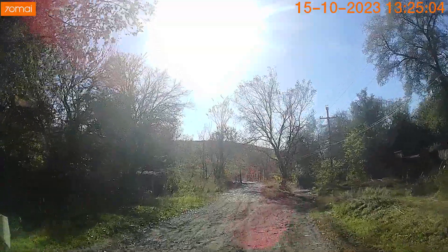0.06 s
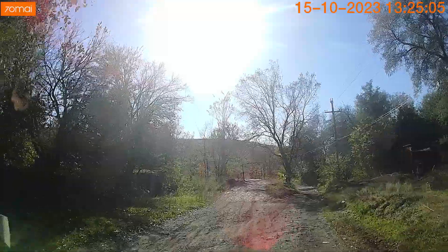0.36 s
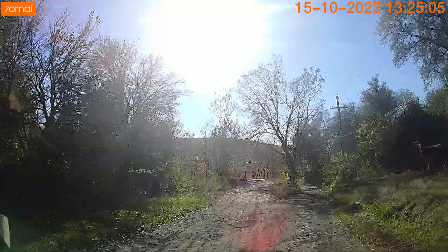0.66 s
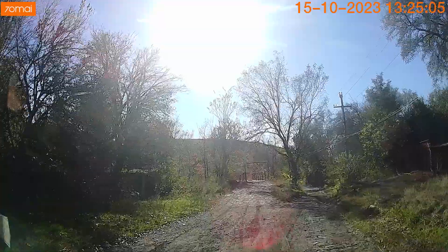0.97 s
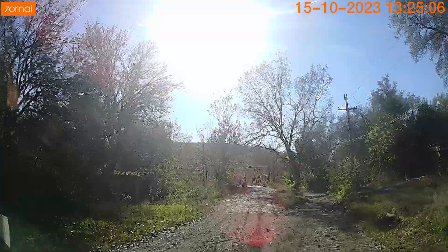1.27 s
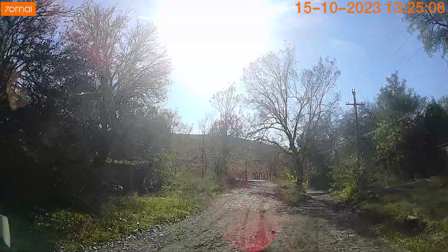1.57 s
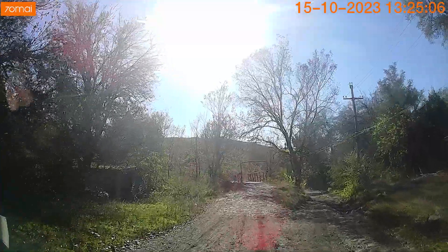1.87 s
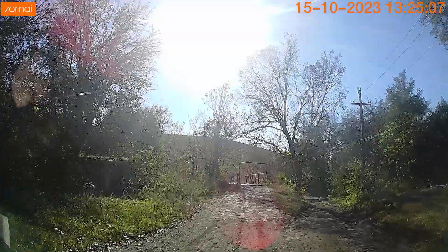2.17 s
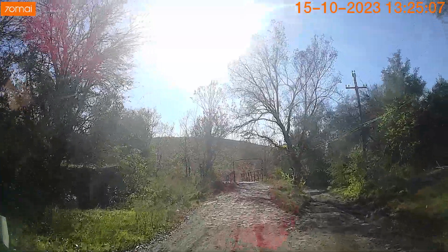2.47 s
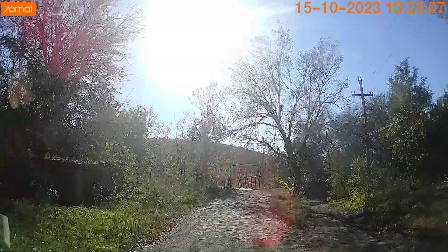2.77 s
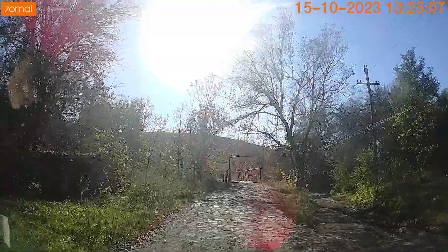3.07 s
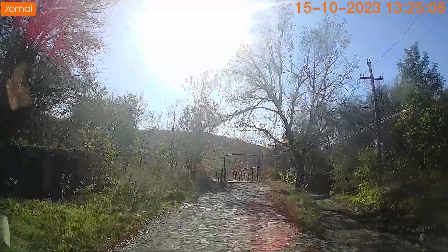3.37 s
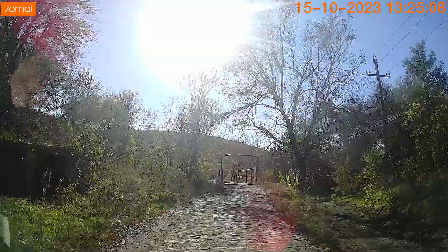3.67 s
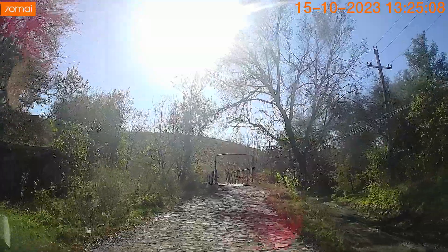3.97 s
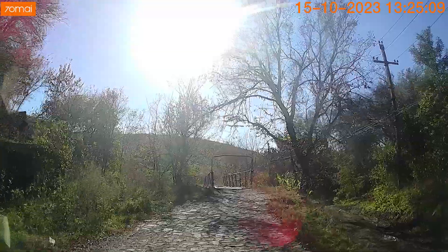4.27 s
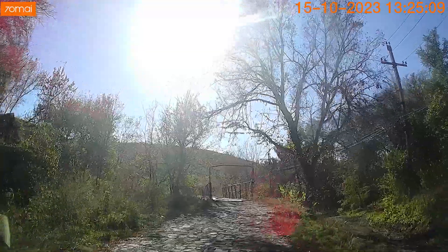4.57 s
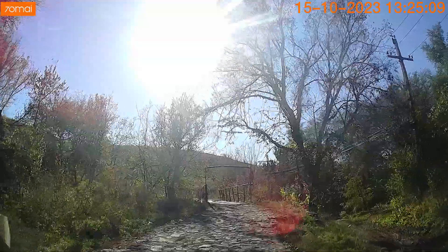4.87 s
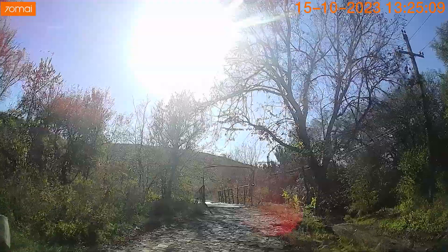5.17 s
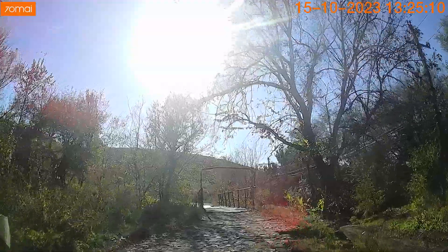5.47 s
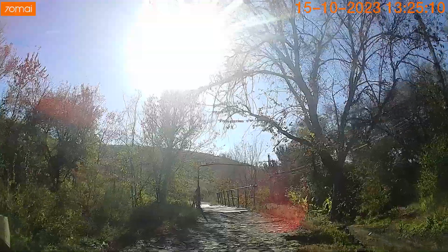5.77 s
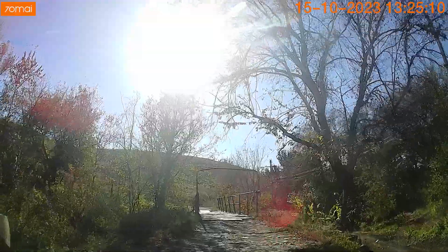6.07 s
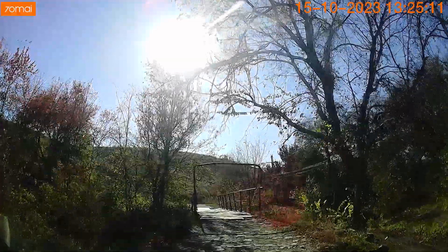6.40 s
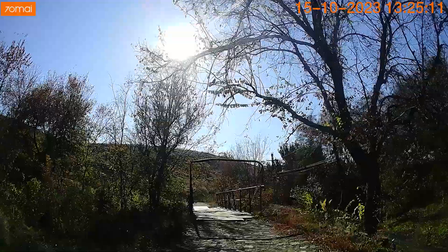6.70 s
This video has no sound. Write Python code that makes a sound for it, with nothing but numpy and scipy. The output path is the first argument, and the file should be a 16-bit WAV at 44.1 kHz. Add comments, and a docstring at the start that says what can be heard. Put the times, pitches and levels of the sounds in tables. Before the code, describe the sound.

Inside a car rolling slowly on a rough road: deep rumble, crunching grit, stones thumping the tyres and loose trim rattling and knocking.

```python
"""A deep, swaying rumble and tyres crunching over grit, inside a car rolling slowly along a dirt road.
Ruts heave the body and make the cabin boom; stones thump the tyres and ring the floor.
Jolts set body sheets humming and loose trim rattling and buzzing; a plastic panel knocks,
a small hard part ticks close by and a tight joint creaks.
After about 4 s the road turns into rough cobbles, and a floor panel starts to drone."""
import sys
import numpy as np
from scipy import signal
from scipy.fft import rfft, irfft, next_fast_len
from scipy.io import wavfile
from scipy.ndimage import uniform_filter1d

SR = 44100
rng = np.random.default_rng(int(sys.argv[2]) if len(sys.argv) > 2 else 0)


def master_out(mix):
    """Clip the mix to full scale and print it as 16-bit PCM to the path in sys.argv[1]."""
    frames = np.transpose(np.atleast_2d(mix))
    ceiling = np.clip(frames, -1, 1)
    pcm = np.round(ceiling * 32767).astype(np.int16)
    wavfile.write(sys.argv[1], SR, pcm)


N = 297234

# Road roughness. Each row: time in seconds, level in dB.
ROAD_ROUGHNESS = [(0.0, -34.5), (0.39, -36), (0.73, -33), (1.31, -37), (1.9, -34.5), (2.19, -31.5),
                  (2.46, -35), (3.4, -35.5), (4.15, -37.5), (4.28, -34.5), (4.49, -30), (4.72, -30.5),
                  (4.86, -32), (5.05, -31), (5.22, -28), (5.69, -33.5), (5.89, -28.5), (6.74, -35)]
# Tyre blows on stones. Each row: start in seconds, level in dB, favoured frequency in Hz.
STONE_HITS = [(0.473, -18.5, 330), (0.535, -19, 300), (0.604, -14.5, 600), (0.667, -10, 176),
              (0.678, -15.5, 250), (0.696, -9.5, 125), (0.721, -20, 191), (1.021, -19.5, 296),
              (1.332, -17, 540), (1.615, -14, 700), (1.839, -23, 330), (2.75, -18.5, 230),
              (2.812, -19, 325), (3.117, -17, 428), (3.155, -18.5, 380), (3.425, -17.5, 480),
              (4.253, -24, 520), (4.387, -11.5, 520), (4.598, -11, 340), (4.663, -12.5, 347),
              (4.721, -16, 206), (4.815, -13.5, 514), (4.897, -11, 520), (4.966, -21, 370),
              (5.027, -11, 337), (5.246, -10, 392), (5.265, -15, 650), (5.279, -12.5, 302),
              (5.312, -10, 620), (5.362, -13.5, 630), (5.668, -11, 253), (5.832, -13, 333),
              (5.997, -21, 196), (6.326, -11, 292), (6.338, -12, 485), (6.376, -18, 400), (6.455, -14, 500),
              (6.525, -16, 360), (6.68, -21.5, 334)]
# Floor and wheel arch modes. Each row: frequency in Hz, level in dB, T60 in seconds.
FLOOR_RESONANCES = [(135, -15, 0.077), (176.6, -2.5, 0.065), (198.8, -9.5, 0.13), (302, -4, 0.047),
                    (365, -5.5, 0.03), (472, -12.5, 0.054), (680, -8.5, 0.0074), (913, -13, 0.052)]


def from_db(db):
    return 10 ** (np.asarray(db) / 20)


def unit_rms(x):
    return x / np.sqrt(np.mean(x ** 2) + 1e-20)


def drift(corner_hz):
    """Low-passed random wander, RMS about 1."""
    hop, settle = 40, 2000
    pole = np.exp(-2 * np.pi * corner_hz * hop / SR)
    noise = rng.standard_normal(N // hop + settle + 2)
    slow = signal.lfilter([1], [1, -2 * pole, pole * pole], noise)[settle:]
    return np.interp(np.arange(N) / hop, np.arange(len(slow)), unit_rms(slow))


def colour(x, spectrum):
    """Minimum-phase filter from (Hz, dB) points; white noise keeps its power."""
    size = 16384
    hz, db = np.transpose(spectrum)
    log_hz = np.log(np.maximum(np.arange(size // 2 + 1) * SR / size, 1))
    outside = np.abs(log_hz - np.clip(log_hz, np.log(hz[0]), np.log(hz[-1])))
    rolloff_db = np.minimum(50 * outside, 70)
    gain = unit_rms(from_db(np.interp(log_hz, np.log(hz), db) - rolloff_db))
    cepstrum = irfft(np.log(gain))
    cepstrum[1:size // 2] *= 2
    cepstrum[size // 2 + 1:] = 0
    return signal.fftconvolve(x, irfft(np.exp(rfft(cepstrum))))[:len(x)]


def rumble(spectrum, even_s):
    """Coloured noise, power levelled over spans of even_s; unit RMS."""
    noise = signal.hilbert(colour(rng.standard_normal(next_fast_len(N + SR)), spectrum))
    power = uniform_filter1d(np.abs(noise) ** 2, max(int(even_s * SR), 1))
    return unit_rms((noise.real / np.sqrt(power + 1e-9))[-N:])


def contacts(per_s, spread_db):
    """Impulses of random time, size and sign; unit RMS."""
    sizes = from_db(spread_db * np.minimum(rng.exponential(1, N), 4))
    signs = rng.choice([-1, 1], N)
    return unit_rms(sizes * signs * (rng.random(N) < per_s / SR))


def ring(clicks, hz, t60_s):
    """One mode: each click starts a decaying sine."""
    radius = from_db(-60 / (t60_s * SR))
    angle = 2 * np.pi * hz / SR
    return signal.lfilter([0, np.sin(angle)], [1, -2 * radius * np.cos(angle), radius ** 2], clicks + 1e-18)


def strike(start_s, db, peak_hz, modes, focus, vary_db, bounce_s, bounce_db, scatter=0.3):
    """Each hit and its one rebound ring all modes; focus favours those near peak_hz."""
    rebound_s = start_s + bounce_s * (1 + scatter * rng.uniform(-1, 1, len(start_s)))
    at = np.clip(np.r_[start_s, rebound_s] * SR, 0, N - 1).astype(int)
    out = np.zeros(N)
    for k, (hz, mode_db, t60_s) in enumerate(modes):
        force = from_db(db + mode_db) / (1 + focus * np.log2(hz / peak_hz) ** 2)
        variation = from_db(vary_db * rng.standard_normal(len(at)))
        clicks = np.zeros(N)
        clicks[at] = np.r_[force, force * from_db(bounce_db)] * variation
        out += (-1) ** k * ring(clicks, hz, t60_s)
    return out


def cabin(x, wet_db, t60_s=0.061):
    """Close glass and soft seats add a dense, very short tail."""
    t = np.arange(SR // 5) / SR
    tail = rng.standard_normal(len(t)) * from_db(-60 * t / t60_s) * (t > 0.002)
    return x + from_db(wet_db) * signal.fftconvolve(x, tail / np.linalg.norm(tail))[:N]


def road_gain(curve, mean_db, db_per_db, lag_s=0):
    """Gain that follows a (seconds, dB) road curve about its mean."""
    time_s, db = np.transpose(curve)
    road_db = np.interp(np.arange(N) / SR, time_s + lag_s, db)
    return from_db(mean_db + db_per_db * (road_db - road_db.mean()))


def ruts(attack_s=0.011, release_s=0.013):
    """Sway and boom gains, held while the wheels run through a rut."""
    # Each row: start in seconds, length in seconds, sway in dB, boom in dB.
    crossings = [(0.0, 0.082, -16, -22), (0.287, 0.33, -18, -29.5), (0.666, 0.23, -15.5, -26),
                 (1.25, 0.073, -30, -22), (1.333, 0.096, -14.5, -30), (1.475, 0.23, -17.5, -31.5),
                 (1.971, 0.15, -17, -43), (2.204, 0.1, -18, -27), (2.517, 0.44, -19.5, -36),
                 (3.034, 0.17, -26, -29), (3.226, 0.2, -17.5, -34.5), (3.548, 0.16, -16.5, -47),
                 (3.785, 0.054, -15.5, -33), (4.044, 0.1, -18.5, -46), (4.607, 0.11, -15, -29.5),
                 (5.085, 0.062, -9.5, -28), (5.27, 0.26, -13, -39), (5.53, 0.15, -39, -24),
                 (5.907, 0.26, -14.5, -43), (6.312, 0.38, -17, -26)]
    t = np.arange(N) / SR
    sway_gain, boom_gain = np.zeros((2, N))
    for start_s, length_s, sway_db, boom_db in crossings:
        attack = np.clip((t - start_s) / attack_s, 0, 1)
        heave = attack * np.exp(-np.clip(t - start_s - length_s, 0, 1) / release_s)
        sway_gain += from_db(sway_db) * heave
        boom_gain += from_db(boom_db) * heave
    return sway_gain, boom_gain


def body_sway(rut_gain):
    """The body answers the surface with a lag and bounces on its tyres at ruts."""
    # Sway and bounce spectra. Each row: frequency in Hz, density in dB.
    sway_spectrum = [(16, -35), (22, 6.5), (29, -0.5), (36, -2), (45, 0), (56, -9), (68, -29)]
    bounce_spectrum = [(22, -11.5), (28, 7), (34, 4), (42, -0.5), (52, -10), (62, -25)]
    gain = road_gain(ROAD_ROUGHNESS, mean_db=-21, db_per_db=0.9, lag_s=0.4)
    return gain * rumble(sway_spectrum, even_s=0.096) + rut_gain * rumble(bounce_spectrum, even_s=0.06)


def cabin_boom(rut_gain):
    """The cabin air booms with road roughness and ruts."""
    # Each row: frequency in Hz, density in dB.
    spectrum = [(45, -22.5), (58, 7), (69, -5.5), (82, 3.5), (104, -7.5), (122, -5), (140, -5.5),
                (168, -18), (210, -31)]
    gain = road_gain(ROAD_ROUGHNESS, mean_db=-27, db_per_db=1)
    return np.hypot(gain, rut_gain) * rumble(spectrum, even_s=0.093)


def stone_flares(relative_db=-17.5, rise_s=0.0027, fall_s=0.04):
    """Gain of the extra roar as a tyre climbs a stone."""
    kicks = np.zeros(N)
    for start_s, db, _ in STONE_HITS:
        kicks[int(start_s * SR)] += from_db(db + relative_db) ** 2
    power = signal.lfilter([1], [1, -np.exp(-2 / (fall_s * SR))], kicks + 1e-18)
    return uniform_filter1d(np.sqrt(power), int(rise_s * SR))


def tyre_roar():
    """Rolling roar and pebbles drumming on the floor, swelling from stone to stone."""
    # Each row: frequency in Hz, density in dB.
    spectrum = [(130, -13.5), (175, -5.5), (210, 2), (260, -4.5), (310, -4.5), (370, -5), (440, -12.5),
                (540, -8), (680, -13), (950, -17.5), (1400, -34), (2600, -35.5)]
    drumming = sum(from_db(db) * ring(contacts(per_s=70, spread_db=-1), hz, t60_s)
                   for hz, db, t60_s in FLOOR_RESONANCES[1:6])
    roar = from_db(-2.2) * rumble(spectrum, even_s=0.054) + from_db(-4.5) * unit_rms(drumming)
    swell = from_db(1.31 * drift(corner_hz=12))
    gain = road_gain(ROAD_ROUGHNESS, mean_db=-33.5, db_per_db=0.76) * swell
    return np.hypot(gain, stone_flares()) * roar


def grit():
    """Gravel crunches in clumps over a smooth rolling hiss."""
    # Loose grit on the road. Each row: time in seconds, level in dB.
    gravel = [(0.0, -51), (1.18, -51.5), (2.29, -47), (2.48, -48.5), (4.05, -50.5), (4.34, -49.5),
              (4.56, -47.5), (4.94, -45), (5.29, -42.5), (5.67, -46), (5.91, -46), (6.74, -45)]
    # Each row: frequency in Hz, density in dB.
    spectrum = [(600, -9), (1000, 7), (1400, 2), (1900, -3), (2500, -5), (3000, -7), (3700, -10),
                (4600, -13.5), (6200, -17), (7400, -19), (8600, -37.5)]
    crunch = contacts(per_s=900, spread_db=6) * from_db(2.8 * drift(corner_hz=25))
    hiss = rng.standard_normal(N)
    mix = from_db(-6.5) * cabin(crunch, wet_db=1.5) + from_db(-3.5) * hiss
    return road_gain(gravel, mean_db=-48.5, db_per_db=0.78) * colour(mix, spectrum)


def trim_clatter():
    """Loose trim taps at random, harder on rougher road."""
    # Each row: frequency in Hz, level in dB, T60 in seconds.
    modes = [(1206, 2, 0.03), (1525, -3.5, 0.03), (1850, 1.5, 0.013), (2320, -2, 0.018), (2575, 0, 0.016),
             (2810, -8.5, 0.012), (3120, -1.5, 0.011), (3640, -5, 0.016), (3980, -7, 0.012),
             (5800, -9, 0.012)]
    taps = sum(from_db(db) * ring(contacts(per_s=40, spread_db=2.5), hz, t60_s) for hz, db, t60_s in modes)
    return road_gain(ROAD_ROUGHNESS, mean_db=-56, db_per_db=1.7) * unit_rms(taps)


def trim_rattles(rise_s=0.00085, fall_s=0.0017, bounce_hz=380, jitter=0.3, swing_db=4.5):
    """Jolted trim bounces on its seat in short bursts of rapid contacts."""
    # Each row: start in seconds, length in seconds, dull level in dB, bright level in dB.
    bursts = [(0.132, 0.019, -43, -55), (0.357, 0.0088, -45, -59), (0.589, 0.008, -41, -64),
              (0.754, 0.008, -48, -55), (1.027, 0.015, -40.5, -60), (1.094, .02, -37, -49),
              (1.257, 0.021, -37, -46), (1.329, 0.01, -37.5, -45.5), (1.603, 0.043, -38.5, -54),
              (1.64, 0.02, -47, -42.5), (1.676, 0.004, -36, -51), (1.834, 0.018, -43, -52.5),
              (2.012, 0.031, -42.5, -57), (2.085, 0.02, -44, -53), (2.353, 0.0074, -39, -54),
              (2.423, 0.013, -35.5, -48), (2.556, 0.02, -55, -50), (2.604, 0.0078, -60, -43),
              (2.789, 0.013, -45, -53), (2.93, 0.006, -42, -56), (2.973, 0.03, -44.5, -56),
              (3.051, 0.022, -39.5, -49), (3.111, 0.021, -38.5, -49), (3.137, 0.021, -37, -48),
              (3.262, 0.017, -47.5, -60), (3.369, 0.019, -40.5, -54.5), (3.406, 0.033, -46, -79),
              (3.845, 0.0075, -47, -57), (3.86, 0.012, -45.5, -54), (3.876, 0.02, -41, -51),
              (3.933, 0.014, -42, -52.5), (4.249, 0.0092, -42, -60), (4.313, 0.022, -48, -55),
              (4.381, 0.01, -38, -49), (4.401, 0.026, -41.5, -47), (4.477, 0.007, -34.5, -47),
              (4.518, 0.02, -40, -44), (4.541, 0.012, -47, -45), (4.553, 0.0086, -32, -41),
              (4.594, 0.0096, -33.5, -36.5), (4.607, 0.018, -37, -44), (4.627, 0.022, -43, -49),
              (4.664, 0.024, -41, -45.5), (4.698, 0.018, -38.5, -54), (4.811, 0.017, -44, -43),
              (4.891, 0.011, -46, -49), (4.986, 0.0097, -42.5, -48), (5.02, 0.012, -39, -50),
              (5.036, 0.0059, -31, -41), (5.243, 0.017, -41.5, -55), (5.173, 0.0062, -39, -57),
              (5.316, 0.0054, -44, -48), (5.476, 0.0052, -40, -48), (5.671, 0.024, -41.5, -50.5),
              (5.881, 0.014, -37.5, -37), (5.904, 0.032, -46, -45), (5.993, 0.05, -43, -51.5),
              (6.147, 0.0098, -40, -53), (6.308, 0.054, -42.5, -51), (6.509, 0.011, -44, -54),
              (6.677, 0.0075, -41.5, -48)]
    # Spectra of the two bands. Each row: frequency in Hz, density in dB.
    dull_spectrum = [(300, -8.5), (600, 9), (1150, 0), (1700, 0.5), (2400, 1.5), (3000, -4), (3800, -20.5),
                     (5000, -36)]
    bright_spectrum = [(2400, -9), (3300, 1), (4000, 5.5), (5100, -0.5), (6000, -1), (7400, -7),
                       (8600, -23.5)]
    t = np.arange(N) / SR
    dull_gain, bright_gain = np.zeros((2, N))
    for start_s, length_s, dull_db, bright_db in bursts:
        span = slice(int(start_s * SR), int((start_s + length_s) * SR) + SR // 10)
        age_s = np.maximum(t[span] - start_s, 0)
        attack = 1 - np.exp(-age_s / rise_s)
        burst = attack * np.exp(-0.5 * age_s / length_s - np.maximum(age_s - length_s, 0) / fall_s)
        dull_gain[span] += from_db(dull_db) * burst
        bright_gain[span] += from_db(bright_db) * burst
    rate_hz = bounce_hz * (1 + jitter * drift(corner_hz=150))
    bounce = np.cos(2 * np.pi * np.cumsum(rate_hz) / SR)
    chatter = unit_rms(contacts(per_s=4600, spread_db=0.5) * from_db(swing_db * bounce))
    dull = from_db(3) * colour(chatter * dull_gain, dull_spectrum)
    bright = from_db(1) * colour(chatter * bright_gain, bright_spectrum)
    return cabin(dull + bright, wet_db=-10.5)


def panel_knocks():
    """A plastic panel slaps its mount."""
    # Each row: start in seconds, level in dB, favoured frequency in Hz.
    blows = [(0.1363, -19, 950), (0.195, -23, 1790), (0.359, -21.5, 1500), (0.586, -23, 1600),
             (1.261, -23.5, 1880), (1.33, -24, 1000), (1.61, -23, 1400), (1.644, -21, 1710),
             (1.742, -17, 1600), (1.81, -14.5, 1320), (2.089, -20, 1420), (2.094, -22.5, 2400),
             (2.356, -21, 1420), (2.412, -32, 900), (2.4235, -21, 1510), (2.903, -14, 1010),
             (3.057, -17.5, 1100), (3.117, -29, 1200), (3.153, -29, 1300), (3.348, -21.5, 1400),
             (3.412, -18, 900), (3.842, -24, 1300), (4.094, -29.5, 1100), (4.319, -13.5, 910),
             (4.386, -32, 1010), (4.481, -27, 1300), (4.554, -14, 1600), (4.597, -30, 1900),
             (4.616, -25, 2400), (4.667, -38, 1500), (4.897, -32, 700), (5.022, -20.5, 1000),
             (5.041, -20.5, 2700), (5.253, -20, 800), (5.266, -27, 1000), (5.3126, -18, 900),
             (5.362, -28, 800), (5.883, -21, 2800)]
    # Each row: frequency in Hz, level in dB, T60 in seconds.
    modes = [(483, -10, 0.046), (864, -2, 0.0094), (990, -4, 0.013), (1192, -14.5, 0.059),
             (1473, -6, 0.0087), (1920, -11.5, 0.013), (2300, -7.5, 0.0062), (2850, -7.5, 0.006),
             (4150, -16.5, 0.0055), (6100, -17, .005)]
    hits = strike(*np.transpose(blows), modes, focus=0.27, vary_db=1.5, bounce_s=0.00307, bounce_db=-6)
    return from_db(-4) * cabin(hits, wet_db=-12)


def part_ticks():
    """A small hard part hits and rebounds: a dry double click, nearly the same each time."""
    # Each row: start in seconds, level in dB.
    ticks = [(0.398, -38), (0.758, -37.5), (1.461, -38), (1.6964, -32), (1.933, -33), (3.524, -44),
             (3.754, -33.5), (4.2375, -28), (4.253, -41), (4.8668, -38), (5.1851, -37), (5.439, -37)]
    # Each row: frequency in Hz, level in dB, T60 in seconds.
    modes = [(3450, -16, .003), (4100, -7, .005), (5070, -7, .005), (5590, -10, .005), (6100, -9, .005),
             (7050, -12, .0025)]
    clicks = strike(*np.transpose(ticks), 5500, modes, focus=0, vary_db=1,
                    bounce_s=0.00197, bounce_db=-2, scatter=0.01)
    return from_db(5.5) * signal.sosfilt(signal.butter(2, 3000, "high", fs=SR, output="sos"), clicks)


def stone_thumps():
    """A tyre hits a stone and drops off it, ringing the floor; rubber swallows the treble."""
    hits = strike(*np.transpose(STONE_HITS), FLOOR_RESONANCES, focus=4.4, vary_db=0.5,
                  bounce_s=0.014, bounce_db=-11.5)
    return from_db(1) * signal.sosfilt(signal.butter(2, 1500, fs=SR, output="sos"), hits)


def sheet_hums():
    """A jolted body sheet swells into resonance and fades; its pitch wavers as the body flexes."""
    # Each row: start in seconds, length in seconds, pitch in Hz, level in dB.
    hums = [(0.66, 0.048, 204.7, -18), (0.68, 0.057, 135, -17), (0.71, 0.052, 204, -24),
            (2.524, 0.063, 278, -31), (2.67, 0.097, 208.3, -30), (5.238, 0.032, 415, -22),
            (5.26, 0.053, 309.6, -27), (5.512, 0.052, 305, -25), (5.964, 0.099, 197, -24),
            (6.434, 0.055, 238.6, -22), (6.475, 0.051, 292, -30.5)]
    out = np.zeros(N + SR)
    flex = 1 + 0.049 * drift(corner_hz=28.5)
    for start_s, length_s, hz, db in hums:
        at = int(start_s * SR)
        phase = 2 * np.pi * np.cumsum(hz * flex[at:at + int(length_s * SR)]) / SR
        out[at:at + len(phase)] += from_db(db) * np.sqrt(2) * np.sin(phase) * np.hanning(len(phase))
    return out[:N]


def fitting_buzzes(t60_cycles=45):
    """Loose fittings chatter against their seats, each ringing at its own pitch."""
    # Each row: start in seconds, length in seconds, pitch in Hz, relative level in dB.
    buzzes = [(0.749, 0.02, 1850, -34.5), (1.615, 0.035, 2300, -38), (3.336, 0.08, 786, -40),
              (4.383, 0.033, 5900, -56), (4.512, 0.022, 3050, -30.5), (4.513, .02, 5870, -43),
              (4.592, 0.028, 5950, -43), (4.598, 0.029, 2550, -37), (4.811, 0.021, 840, -21.5),
              (5.018, 0.012, 6640, -38), (5.245, 0.017, 830, -26.5), (5.309, 0.019, 840, -25.5),
              (5.539, 0.019, 3750, -37), (5.894, 0.027, 5940, -51), (5.879, 0.023, 2940, -31.5),
              (5.895, 0.039, 2240, -34), (6.334, 0.018, 3600, -36), (6.487, 0.015, 2630, -35.5)]
    out = np.zeros(N)
    chatter = contacts(per_s=1200, spread_db=2)
    for start_s, length_s, hz, db in buzzes:
        at, n = int(start_s * SR), int(length_s * SR)
        tone = ring(chatter[at:at + n], hz, t60_cycles / hz) * signal.windows.tukey(n, 0.4)
        out[at:at + n] += from_db(db - 9) * unit_rms(tone)
    return out


def joint_creaks(slip_s=0.012):
    """A tight joint slips as the body twists; each slip is a run of tiny catches that ring it."""
    # Each row: start in seconds, level in dB.
    slips = [(2.147, -58), (2.158, -57), (2.175, -57), (2.188, -57), (2.208, -55), (2.244, -57),
             (2.912, -55), (2.926, -54), (2.939, -56), (2.962, -53), (2.977, -62)]
    # Each row: frequency in Hz, level in dB, T60 in seconds.
    modes = [(5150, 6, 0.0044), (6170, 6, 0.0082)]
    out = np.zeros(N)
    n = int(slip_s * SR)
    catches = contacts(per_s=2000, spread_db=2)
    scrape = sum(from_db(db) * ring(catches, hz, t60_s) for hz, db, t60_s in modes)
    for start_s, db in slips:
        at = int(start_s * SR)
        out[at:at + n] += from_db(db) * unit_rms(scrape[at:at + n] * signal.windows.tukey(n, 0.5))
    return out


def floor_drone(start_s=4.8, rise_s=0.24, level_db=-37):
    """One broad floor panel resonance, kept going by the cobbles."""
    # Each row: frequency in Hz, density in dB.
    spectrum = [(185, -25), (210, -2.5), (232, -3), (260, -17)]
    onset = np.clip((np.arange(N) / SR - start_s) / rise_s, 0, 1)
    return from_db(level_db) * onset * rumble(spectrum, even_s=0.14)


def scene():
    """Mono mix at the windscreen."""
    trim = trim_rattles() + trim_clatter() + fitting_buzzes()
    trim += joint_creaks() + panel_knocks() + part_ticks()
    rut_sway, rut_boom = ruts()
    body = body_sway(rut_sway) + cabin_boom(rut_boom)
    roar = tyre_roar()
    surge = from_db(0.65 * drift(corner_hz=13))  # the wheels rise and fall
    return (body * surge + roar + floor_drone() + grit() + stone_thumps() + sheet_hums() + trim)[None]


def record(dry):
    """Small recorder with a steep treble cut."""
    cutoff_hz = 8600
    return signal.sosfilt(signal.ellip(10, 0.2, 70, cutoff_hz, fs=SR, output="sos"), dry)


dry = scene()
out = record(dry)
master_out(out)
```